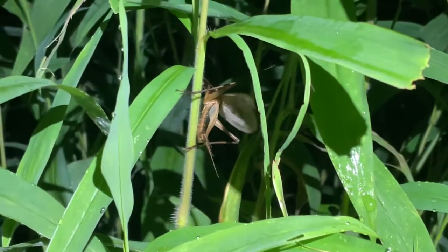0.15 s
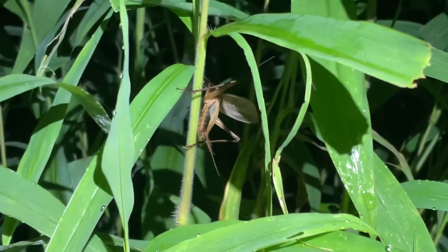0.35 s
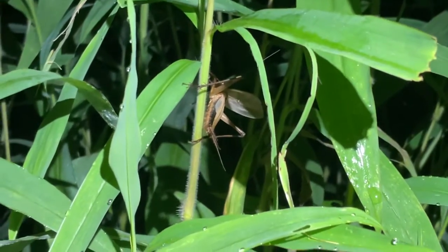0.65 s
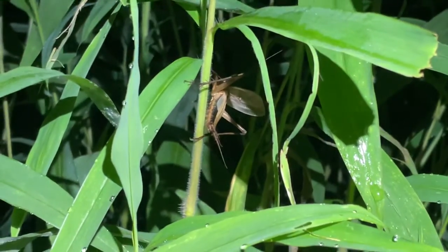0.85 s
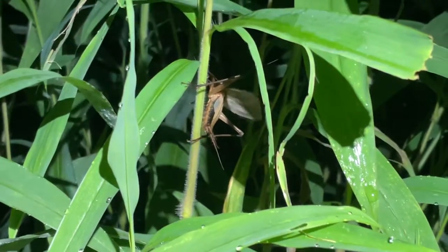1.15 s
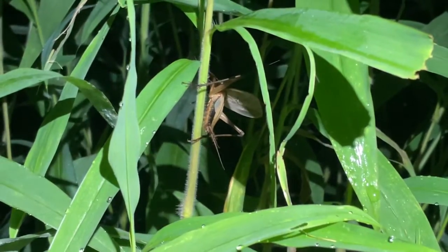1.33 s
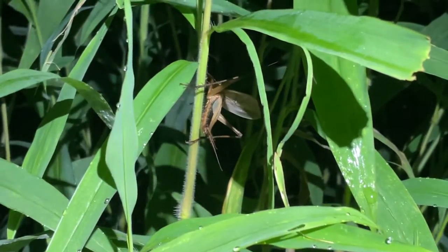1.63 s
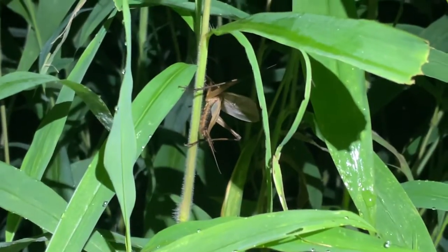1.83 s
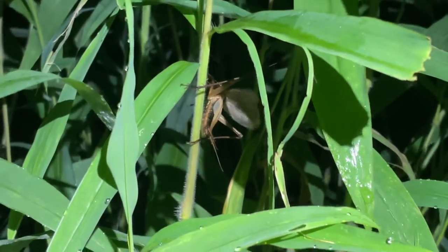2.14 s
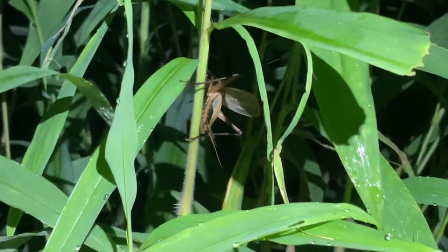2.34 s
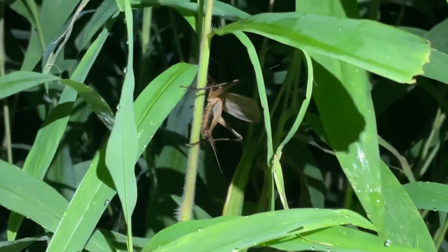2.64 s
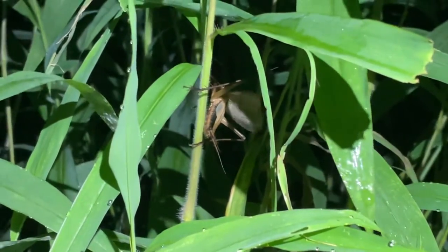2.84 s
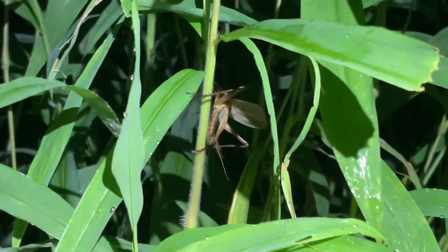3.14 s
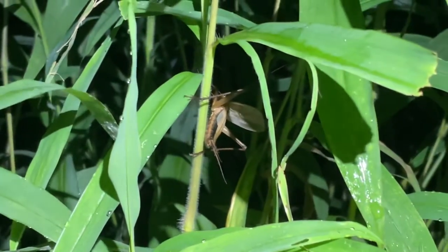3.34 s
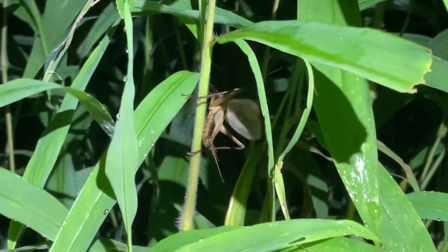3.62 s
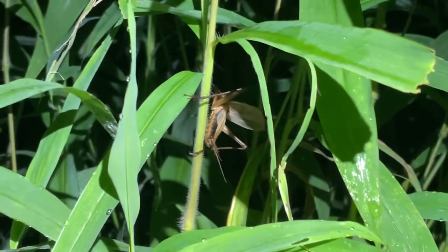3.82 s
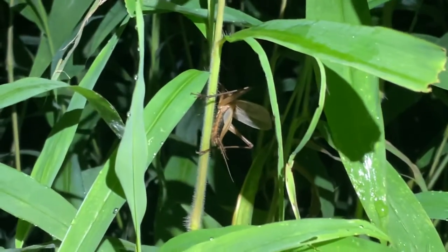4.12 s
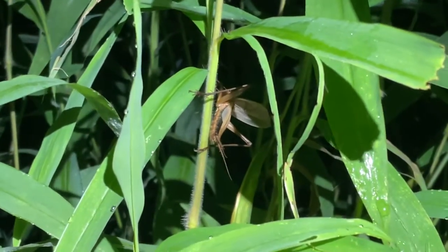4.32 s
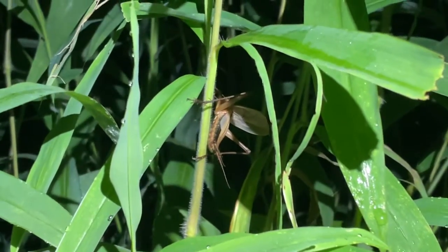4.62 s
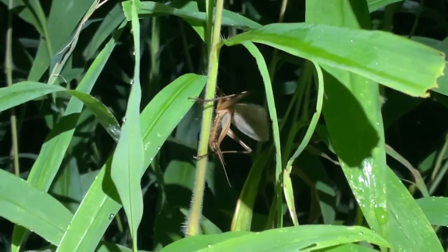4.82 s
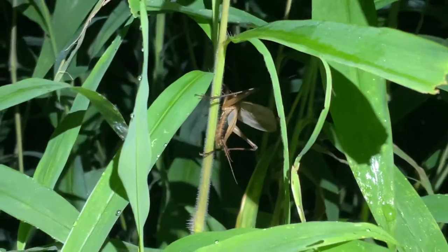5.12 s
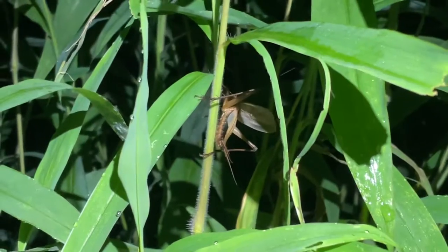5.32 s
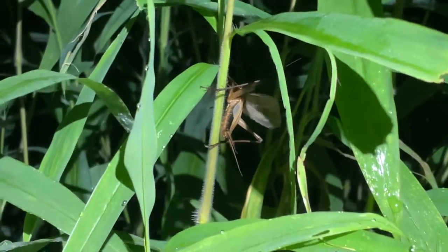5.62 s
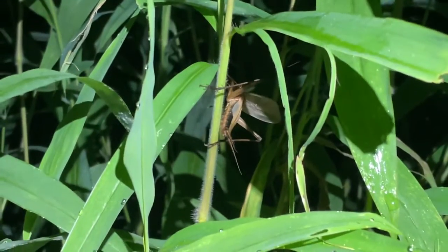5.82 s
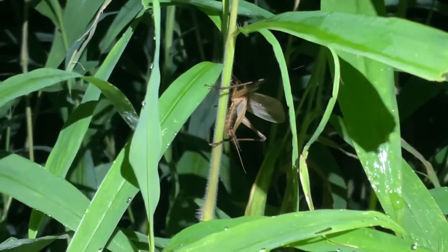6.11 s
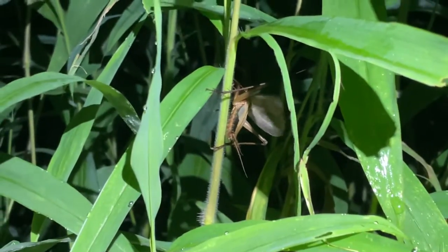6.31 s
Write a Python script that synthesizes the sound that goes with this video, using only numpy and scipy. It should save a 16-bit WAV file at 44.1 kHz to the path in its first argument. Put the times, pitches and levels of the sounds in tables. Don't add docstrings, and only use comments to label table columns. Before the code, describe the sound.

A close cricket sings loud, piercing four-stroke chirps roughly once a second at night, over a thin high shimmer of distant insects and soft air hum.

```python
import sys
import numpy as np
from scipy import signal
from scipy.fft import rfft, irfft
from scipy.io import wavfile
from scipy.ndimage import uniform_filter1d

SR = 44100
rng = np.random.default_rng(int(sys.argv[2]) if len(sys.argv) > 2 else 0)


def voltage_ratio(decibels):
    exponent = np.asarray(decibels, float) / 20
    return 10 ** exponent


def unload_audio(sound):
    columns = np.transpose(np.atleast_2d(sound))
    steps = np.round(np.clip(columns, -1, 1) * 32767)
    wavfile.write(sys.argv[1], SR, steps.astype(np.int16))


N = 284886

# f/Hz, both ports alike/(dB per Hz), ports opposed/(dB per Hz)
NIGHT_AIR = [(20, -110, -125), (54, -85.5, -100), (123, -87, -101), (260, -92.5, -103), (517, -100.5, -100),
             (1050, -99, -100), (2200, -99, -114), (4400, -99, -114), (6730, -99, -104), (7130, -112, -100),
             (9300, -116, -94), (11700, -108, -108), (13500, -110, -122), (16000, -128, -140)]
# centre f/Hz, width/Hz, level/dB, flicker/dB, left lead/rad
FAR_CHORUS = [(3300, 140, -68, 2, 0.82), (4950, 370, -78, 2, 1.7), (6857, 243, -52.5, 0.5, -0.95),
              (7124, 150, -61.5, 4, -1.1), (9800, 500, -72.5, 2.5, 1.9)]
FAR_SINGERS = {"low": (2326, 82.5, -69.5, 1.3), "caller": (3015.5, 104.5, -67.5, .5),
               "trill a": (5790.5, 189, -57, -1.53), "trill b": (5958.5, 59.5, -57.5, -1.4),
               "hiss": (5196.5, 349, -66, 1.3), "buzz": (10144.5, 504.5, -60, 2)}
SINGER_PHRASES = {"low": [(-.06 + .289 * k, .17 + .289 * k) for k in range(23)], "caller": [(.03, .2),
                  (1.08, 1.28), (2.32, 2.52), (3.38, 3.56), (4.43, 4.64), (5.5, 5.72)],
                  "trill a": [(1.2, 1.88), (3.75, 4.58), (6.15, 6.5)], "hiss": [(1.3, 1.9), (2.3, 2.7),
                  (3.25, 3.5), (3.85, 4.85)], "trill b": [(-.1, .48), (2.36, 3.33), (5.17, 6.1)],
                  "buzz": [(-.1, .3), (1.8, 2.62), (3.45, 4.02), (4.3, 4.97), (5.3, 5.88)]}
SINGER_PULSES = {"low": (36, .8), "caller": (65, .7), "trill a": (35.5, .88), "trill b": (37.3, .7),
                 "hiss": (90, .9), "buzz": (121, .6)}
SWAY_DB = 1.3

# t/s, peak level/dB, f/Hz
LEAF_KNOCKS = [
    (.887, -43.5, 710),
    (.891, -43, 191),
    (1.924, -43, 1410),
    (3.594, -45.5, 421),
    (3.66, -43, 127.5),
    (4.28, -46.5, 1520),
    (6.16, -41, 1550),
]

# first return t/s, fading time/s
BUSH_SLAP_S = (.028, .012)
BUSH_SLAP_DB = -33.5
GRASS_T60_S, GRASS_DB, GRASS_GAP_S = 0.69, -40.5, 0.041

# start t/s, stroke to stroke/ms, effort/(-1 to 1), last stroke level over its habit/dB
CHIRP_TIMES = [
    (0.0409, 67.8, -0.6, 0.6),
    (0.9974, 68.3, -0.066, 0.8),
    (1.968, 68.4, 0.0002, 0.1),
    (2.7428, 67.8, 0.13, 1.8),
    (3.5191, 69.1, 0.13, 0.1),
    (4.8323, 67.25, -0.76, 1.1),
    (5.5525, 68.5, 0.85, 0.6),
    (6.2803, 68.6, .7, 0.1),
]
# length/s, peak level/dB, early f/Hz, late f/Hz, gain at full effort/Hz
WING_STROKES = [
    (.053, -18.5, 4594, 4578, 16),
    (.0555, -13, 4656, 4636, 46),
    (.057, -9, 4724, 4748, 10),
    (.061, -10.5, 4735, 4767, 2.5),
]
STROKE_SWELL = [(0.63, 0.5, 1), (0.24, 0.34, .55), (0.2, 0.29, 0.33), (0.13, 0.33, 0.25)]
# starting bend/Hz, sag/Hz, fall begins/(share of length), fall/Hz, scraper catch/dB
STROKE_HABIT = [(40, -20, 0.9, -170, -34), (-25, -3, 0.82, -230, -33), (-50, 4, 0.76, -260, -29),
                (-60, 3, 0.62, -270, -33)]
OVERTONE_PITCH_HZ = (4400, 4550, 4590, 4625, 4672, 4722, 4756, 4790)
# second overtone/dB, third overtone/dB
WING_OVERTONES = [(-22.5, -4), (-21.5, -11), (-20.5, -24.5), (-19.5, -5), (-29, -2), (-31.5, -6.5),
                  (-22.5, -16.5), (-21, -18.5)]
PORT_LEAD = (0.66, 2.59, .03, 0.63)
# about t/s, flutter level/dB, flutter f/Hz
CELL_FLUTTERS = [(0.11, -32, 294), (1.0, -35, 400), (1.97, -29, 192.5), (2.1, -27, 146.5),
                 (2.17, -17.5, 109), (2.88, -19.5, 134.1), (2.95, -26, 125), (4.9, -30, 282),
                 (4.97, -27, 156), (5.03, -21, 239), (5.62, -23.5, 224), (5.69, -24.5, 140),
                 (5.76, -19.5, 113.6)]
CALM_DB, CALM_HZ = -33.5, 110
EFFORT_DB_PER_HZ = 0.07
GRIP_S, LET_GO_S, FADE_POWER = 0.0024, 0.0035, 1.37
CLIMB = 0.45
RASP_DB, RASP_S = -50, 0.07
SCRATCH_DB = -36
THIRD_FADE_S = 0.0087
SCRAPE_LEAD_S, SCRAPE_DB, SCRAPE_HZ = 0.019, -29.5, 13520

BEND = 0.012
TOP_HZ = 15800
DUCK_S, DUCK_TOP_DB, DUCK_POWER = 0.072, -16.5, 0.61


def curve(table, at):
    first, *rest = np.transpose(table)
    return [np.interp(at, first, column) for column in rest]


def band(hz, width):
    f = np.fft.fftfreq(N, 1 / SR)
    resonance = (f > 0) / (1 + (2 * (f - hz) / width) ** 2)
    z = np.fft.ifft(np.fft.fft(rng.standard_normal(N)) * resonance)
    return z * np.sqrt(2 / np.mean(np.abs(z) ** 2))


def walk(rate):
    hold = int(SR / rate)
    steps = np.repeat(rng.standard_normal(N // hold + 1), hold)
    return 1.3 * uniform_filter1d(uniform_filter1d(steps, hold), hold)[:N]


def ports(z, lead):
    return np.real(z * np.exp(0.5j * lead * np.array([[1], [-1]])))


def add(out, x, s):
    i = int(s * SR)
    out[..., i:i + x.shape[-1]] += x[..., :N - i]


def air():
    f = np.fft.rfftfreq(N, 1 / SR)
    logged = [(np.log(hz), alike, opposed) for hz, alike, opposed in NIGHT_AIR]
    mid, side = (irfft(rfft(rng.standard_normal(N)) * voltage_ratio(db) * np.sqrt(SR / 2), N)
                 for db in curve(logged, np.log(f + 1)))
    bass = signal.sosfilt(signal.butter(2, 300, fs=SR, output="sos"), mid)
    mid = mid + bass * (voltage_ratio(2.2 * walk(6)) - 1)
    return mid + side * np.array([[1], [-1]])


def chorus():
    out = 0
    for hz, width, db, flicker_db, lead in FAR_CHORUS:
        level = voltage_ratio(db + flicker_db * walk(130) + 0.9 * walk(2.5))
        out = out + ports(level * band(hz, width), lead)
    return out


def far_singers():
    out, t = 0, np.arange(N) / SR
    for name, (hz, width, db, lead) in FAR_SINGERS.items():
        rate, share = SINGER_PULSES[name]
        singing = sum((t > start) & (t < end) for start, end in SINGER_PHRASES[name]) * 1.0
        singing = uniform_filter1d(singing, size=1800)
        cycle = np.cumsum(rate * (1 + 0.02 * walk(4)) / SR) % 1 / share
        pulse = 0.15 + 1.3 * np.abs(np.sin(np.pi * np.minimum(cycle, 1))) ** 0.7
        voice = band(hz, width)
        voice /= np.sqrt(np.abs(voice))
        out = out + ports(voltage_ratio(db + SWAY_DB * walk(3.03)) * singing * pulse * voice, lead)
        if name == "trill b":
            out = out + ports(voltage_ratio(db - 16) * singing * pulse * voice ** 2, 0.3)
    return out


def knocks():
    out = np.zeros(N)
    for s, db, hz in LEAF_KNOCKS:
        turns = np.arange(int(6 * SR / hz)) * hz / SR
        add(out, voltage_ratio(db) * np.sin(2 * np.pi * turns ** 0.8) * np.exp(-turns / 1.12), s)
    return out


def grass(x):
    t = np.arange(int(0.6 * SR)) / SR
    first_s, fade_s = BUSH_SLAP_S
    slap = (t > first_s) * np.exp((first_s - t) / fade_s)
    slap = slap * voltage_ratio(BUSH_SLAP_DB) / np.sqrt(SR * fade_s / 2)
    fade = np.exp(-np.log(1000) * t / GRASS_T60_S) * (t > GRASS_GAP_S)
    meadow = voltage_ratio(GRASS_DB) * fade / np.sqrt(np.sum(fade ** 2))
    mid, side = rng.standard_normal((2, len(t))) * (slap + meadow)
    tail = mid + 0.35 * side * np.array([[1], [-1]])
    tail = signal.sosfilt(signal.butter(2, 8000, fs=SR, output="sos"), tail)
    return signal.fftconvolve(x, tail, axes=1)[:, :N]


def strokes():
    for start, step_ms, effort, last_db in CHIRP_TIMES:
        for place, (length, db, early_hz, late_hz, gain_hz) in enumerate(WING_STROKES):
            s = start + place * step_ms / 1000
            lift = effort * gain_hz
            shakes = [row[1:] for row in CELL_FLUTTERS if abs(row[0] - s) < 0.033]
            flutter_db, flutter_hz = (shakes + [(CALM_DB, CALM_HZ)])[0]
            db = db + EFFORT_DB_PER_HZ * lift + last_db * (place == len(WING_STROKES) - 1)
            if s * SR < N:
                yield place, s, length, db, early_hz + lift, late_hz + lift, flutter_db, flutter_hz


def swell(place, t, length):
    first, crest, last = STROKE_SWELL[place]
    u = t / length
    rise = first + (1 - first) * np.sin(np.pi / 2 * np.minimum(u / crest, 1))
    fade = 1 - (1 - last) * np.clip((u - crest) / (1 - crest), 0, 1) ** FADE_POWER
    return rise * fade * np.clip(t / GRIP_S, 0, 1) * np.clip((length - t) / LET_GO_S, 0, 1)


def tooth_rate(place, t, length, early_hz, late_hz):
    bend, sag, begin, fall, _ = STROKE_HABIT[place]
    u = t / length
    hz = early_hz + (late_hz - early_hz) * np.minimum((u - 0.2) / CLIMB, 1.15)
    hz += bend * np.exp(-t / 0.0046)
    hz += sag * np.sin(np.pi * np.minimum(u / 0.75, 1)) ** 2
    return hz + fall * np.clip((u - begin) / (1 - begin), 0, 1) ** 2.2


def wing_lock(rasp):
    out = np.zeros((2, N))
    t = np.arange(int(0.013 * SR)) / SR
    for s in np.array(CHIRP_TIMES)[:, 0] - SCRAPE_LEAD_S:
        hz = SCRAPE_HZ - 900 * np.cos(2 * np.pi * t / 0.0056)
        warble = np.exp(2j * np.pi * np.cumsum(hz) / SR)
        rough = 0.076 * rasp[int(s * SR):int(s * SR) + len(t)]
        level = voltage_ratio(SCRAPE_DB + 1.1 * rng.standard_normal()) * np.abs(np.sin(np.pi * t / t[-1]))
        add(out, ports(level * (warble + rough), PORT_LEAD[2]), s)
    return out


def cricket():
    out = np.zeros((2, N))
    tone_lead, second_lead, third_lead, scrape_lead = PORT_LEAD
    rasp = band(13270, 2400) * voltage_ratio(4.6 * walk(400))
    tick, slip = band(4740, 900), walk(300)
    cells = band(5230, 87) + 0.53 * band(5580, 60)
    rattle = band(380, 740)
    scratch = band(0.99, 1100)
    overtones = np.column_stack([OVERTONE_PITCH_HZ, WING_OVERTONES])
    chance = rng.random((len(CHIRP_TIMES) * len(WING_STROKES), 2))
    for stroke, (turn, when) in zip(strokes(), chance):
        place, s, length, db, early_hz, late_hz, flutter_db, flutter_hz = stroke
        i = int(s * SR)
        t = np.arange(min(int((length + 0.017) * SR), N - i)) / SR
        now = slice(i, i + len(t))
        u = t / length
        size = voltage_ratio(db) * signal.lfilter([0.04], [1, -0.96], swell(place, t, length))
        hz = tooth_rate(place, t, length, early_hz, late_hz)
        hz += 4 * slip[now]
        phase = 2 * np.pi * (np.cumsum(hz) / SR + turn)

        beat_hz = flutter_hz * (1 + 0.23 * np.sin(5 * u + 6 * when))
        beat = np.cumsum(beat_hz) * 2 * np.pi / SR
        flutter = voltage_ratio(flutter_db + 10.5) * np.exp(-((u - 0.55) / 0.28) ** 2 + 1j * beat)
        shaking = flutter + 0.5 * flutter ** 2 + 0.1 * np.abs(flutter) * rattle[now]
        worn = voltage_ratio(SCRATCH_DB + 9.6 * turn) * np.exp(-t / 0.025) * scratch[now]
        tone = np.exp(1j * phase) * (1 + worn + shaking)
        tone = tone + voltage_ratio(-26.0) * size * (place > 1) * cells[now]

        second_db, third_db = curve(overtones, uniform_filter1d(hz, size=130))
        second = size * voltage_ratio(second_db) * np.exp(2j * phase)
        third_fade = np.clip((length - t) / THIRD_FADE_S, 0, 1)
        third = size * voltage_ratio(third_db) * third_fade * np.exp(3j * phase)

        catch_db = STROKE_HABIT[place][-1] + 11 * (when - 0.5)
        catch_fade = np.exp(-t / 0.0025) + 0.12 * np.exp(-t / 0.02)
        catch = voltage_ratio(catch_db) * np.minimum(t / 0.0006, 1) * catch_fade
        hiss = voltage_ratio(RASP_DB) * np.exp(-t / RASP_S) * np.clip((t[-1] - t) / 0.0072, 0, 1)
        grit = (catch + hiss) * rasp[now]

        add(out, ports(size * tone + voltage_ratio(-1) * catch * tick[now], tone_lead), s)
        add(out, ports(second, second_lead), s)
        add(out, ports(third, third_lead), s)
        add(out, ports(grit, scrape_lead), s)
    return out + wing_lock(rasp)


def scene():
    near = cricket()
    return air() + chorus() + far_singers() + knocks() + grass(near) + near


def low_pass(x):
    return signal.sosfilt(signal.butter(12, 16350, fs=SR, output="sos"), x)


def record(dry):
    low_band = signal.butter(2, [70, 3000], "band", fs=SR, output="sos")
    bent = dry + signal.sosfilt(low_band, BEND * dry ** 2)
    bent = signal.sosfilt(signal.butter(16, TOP_HZ, fs=SR, output="sos"), bent)
    keep = np.exp(-1 / (DUCK_S * SR))
    loud = np.abs(dry).mean(axis=0)
    for _ in range(2):
        loud = signal.lfilter([1 - keep], [1, -keep], loud)
    gain = (1 + loud / voltage_ratio(DUCK_TOP_DB)) ** -DUCK_POWER
    return low_pass(bent * gain)


dry = scene()
out = record(dry)
unload_audio(out)
```